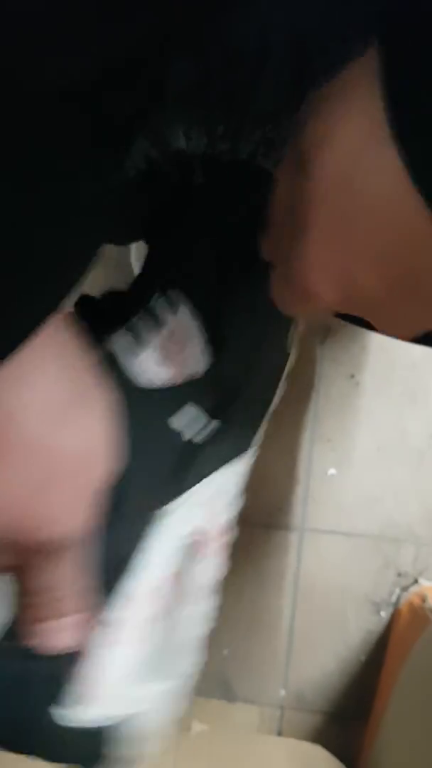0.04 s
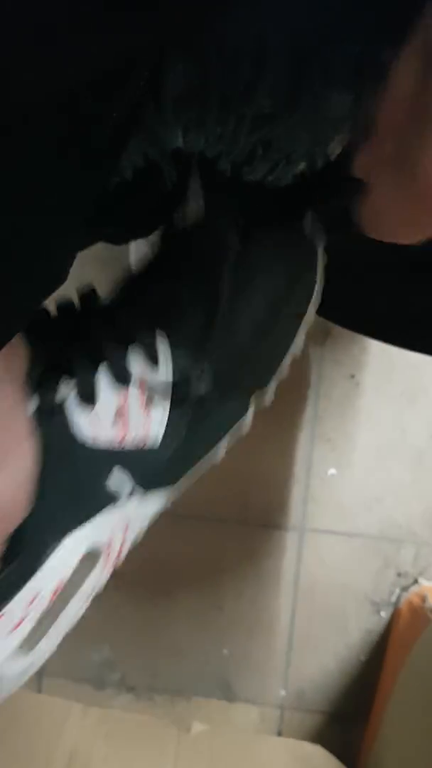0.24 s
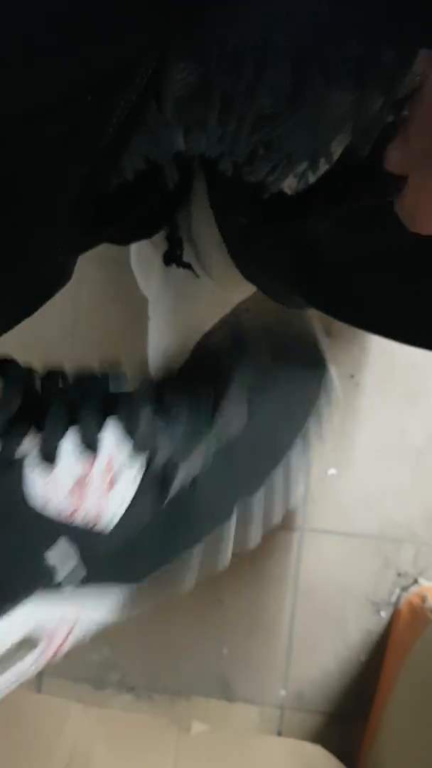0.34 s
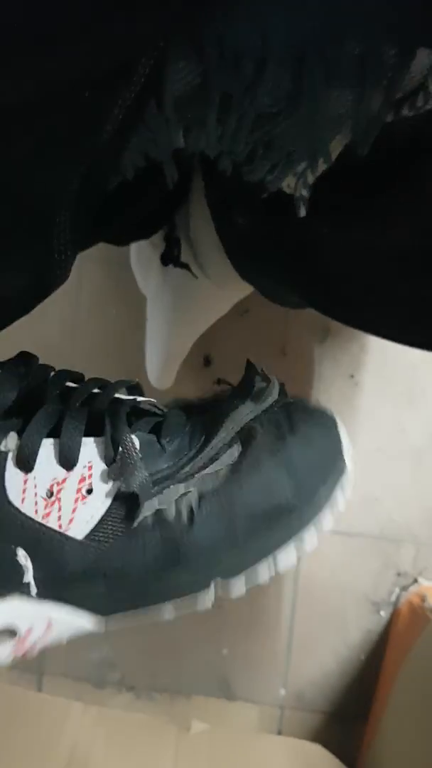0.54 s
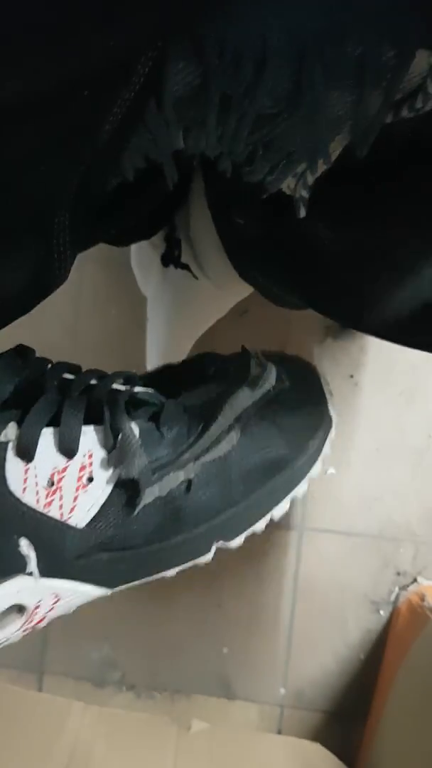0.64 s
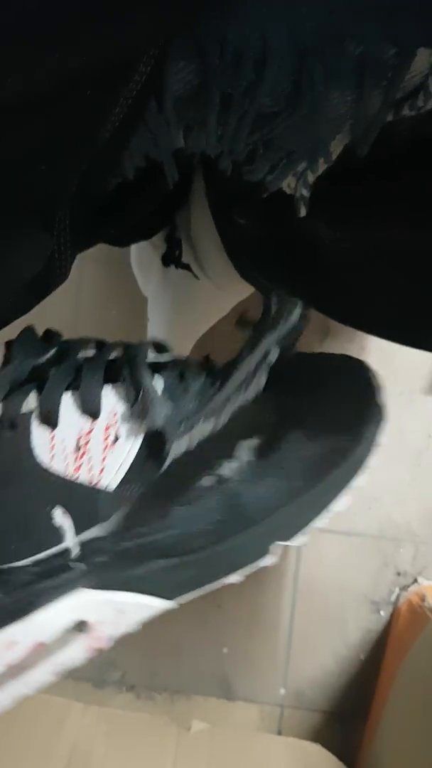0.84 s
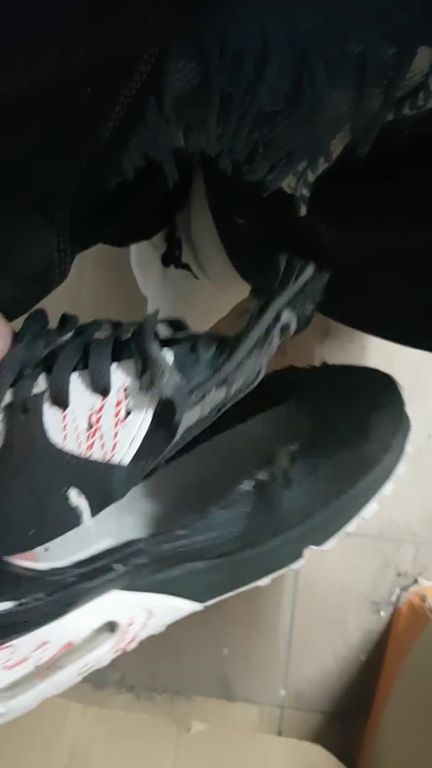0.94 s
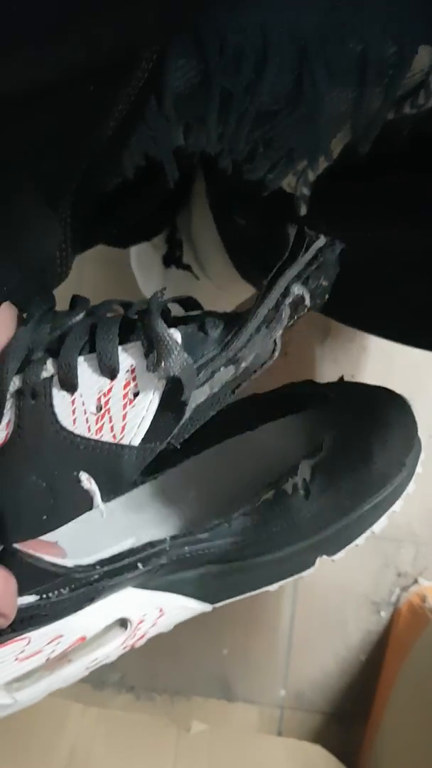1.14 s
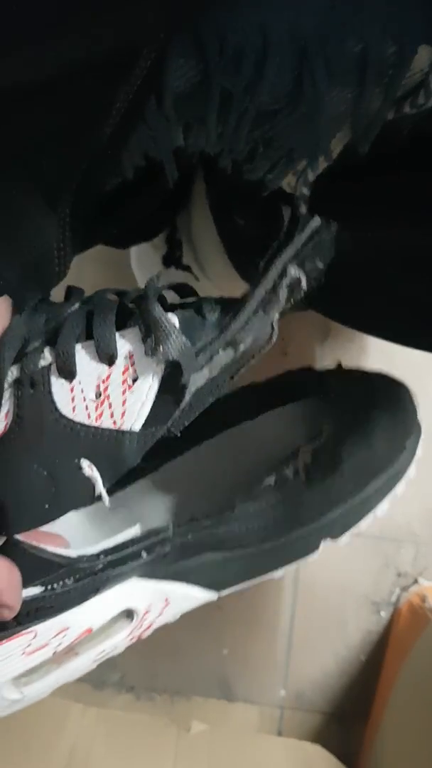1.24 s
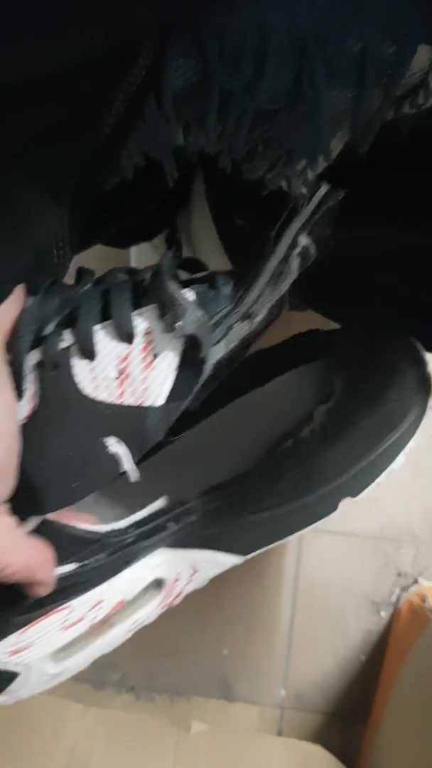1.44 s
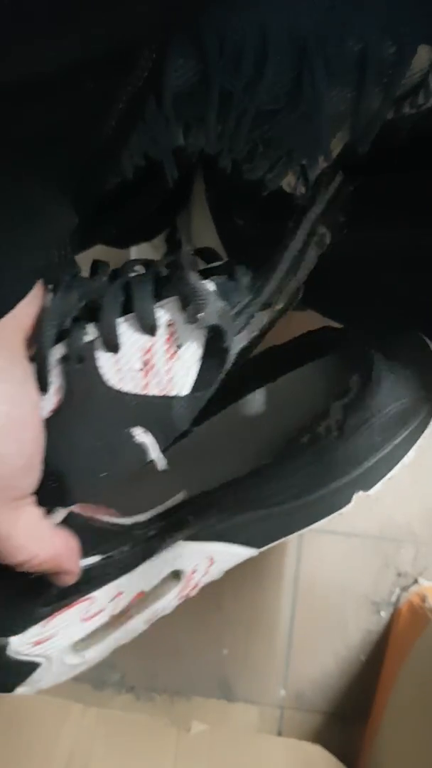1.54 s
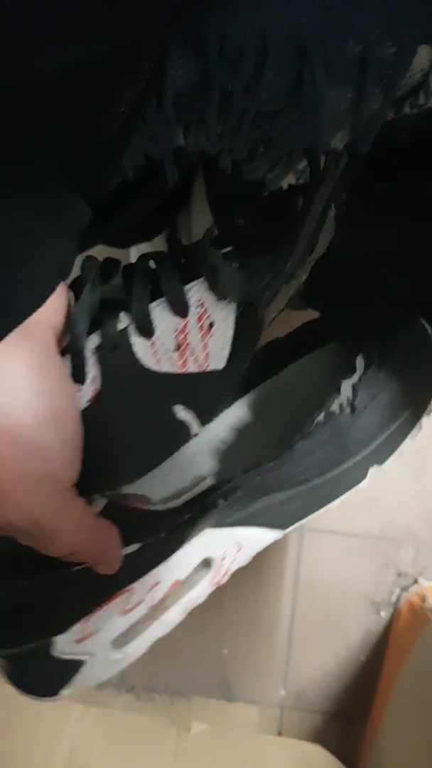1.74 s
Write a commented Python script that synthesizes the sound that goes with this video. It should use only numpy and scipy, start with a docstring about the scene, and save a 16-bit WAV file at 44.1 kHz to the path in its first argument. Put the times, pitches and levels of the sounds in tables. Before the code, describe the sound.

Quick rough rip of sneaker stitching, close on the left, followed by near silence and soft handling

```python
"""Sneaker torn from its sole

The upper of a sneaker is ripped from its sole by hand, close to the left microphone in a small quiet room.
Fibres crackle (random clicks), a run of stitches snaps (noise bursts) and each one thumps the taut panel
(short swings); the last few go late. Loose fabric rustles (filtered noise and clicks), lone threads tick,
and synthetic weave slides with a thin high zip (gliding tones), over a low hum and room air."""
import sys
import numpy as np
from scipy import signal
from scipy.fft import rfft, irfft
from scipy.io import wavfile
from scipy.ndimage import uniform_filter1d, map_coordinates

SR = 44100
rng = np.random.default_rng(int(sys.argv[2]) if len(sys.argv) > 2 else 0)


def master_out(mix):
    """Clip the mix to full scale and print it as 16-bit PCM to the path in sys.argv[1]."""
    frames = np.transpose(np.atleast_2d(mix))
    ceiling = np.clip(frames, -1, 1)
    pcm = np.round(ceiling * 32767).astype(np.int16)
    wavfile.write(sys.argv[1], SR, pcm)


N = 79380  # length in samples

# All levels in the tables are relative: later gains, filters or panning may shift them.
# strain on the fibres: [t/s, level/dB]
PULL_STRAIN = [(0, -46), (.03, -57), (.09, -60.5), (.125, -50), (.155, -50), (.195, -42), (.212, -25),
               (.238, -31), (.262, -34.5), (.29, -45.5), (.332, -49.5), (.35, -58.5), (.42, -65)]
# tone colour of the crackling fibres: [f/Hz, level/dB]
FIBRE_COLOUR = [(150, -8.5), (600, 6), (1100, 12.5), (1900, 5.5), (3500, 1.5), (6000, -4), (9500, -3.5),
                (13000, -1), (16000, 6)]
# tone colour of the panel creaking under the fibres: [f/Hz, level/dB]
CREAK_COLOUR = [(50, -16), (110, -0.5), (200, -2.5), (300, 2.5), (420, -4), (650, -1.5), (1100, -4),
                (1700, -13), (4000, -38.5)]
FIBRES_PER_S, FIBRE_SPREAD_DB, STRAIN_FLUTTER_DB = 14000, 2.0, 1.0
CREAK_DB = 1.5

# stitches that snap: [t/s, crack level/dB, crack centre f/Hz, thump level/dB, panel pitch f/Hz]
STITCHES = [(0.1180, -37, 13000, -37, 400), (0.1440, -41, 3800, -34, 650), (0.1690, -48, 9000, -37, 850),
            (0.1780, -42, 9000, -32, 1000), (0.1937, -45, 6000, -25, 1000), (0.2030, -34, 6000, -17, 760),
            (0.2083, -33, 6000, -23, 900), (0.2126, -27, 3800, -18, 780), (0.2141, -26, 4000, -17, 750),
            (0.2153, -21, 6500, -17, 800), (0.2247, -25, 5500, -18, 900), (0.2272, -26, 4500, -10, 600),
            (0.2289, -27, 10000, -11, 640), (0.2315, -26, 6000, -10, 620), (0.2339, -26, 5500, -13, 620),
            (0.2358, -35, 6000, -17, 560), (0.2376, -31, 12000, -14, 500), (0.2423, -22, 9500, -10, 560),
            (0.2487, -26, 9500, -15, 480), (0.2598, -28, 8000, -12, 680), (0.3324, -41, 7000, -25, 680),
            (0.3346, -41, 9000, -27, 1000), (0.3363, -35, 13000, -27, 820)]
CRACK_S, CRACK_WIDTH_OCT, CRACK_LIFT_DB = .0009, 1.2, 2.5
THUMP_S, SOFT_THUMP_S = .0008, .0016
# the softer swing of the upper, under each thump; its pitch scatters
UPPER_HZ, UPPER_DB, UPPER_SCATTER_OCT = 300, -11, .25
BODY_CUT_HZ = 110

# short fading tones heard after the thumps and creaks: [f/Hz, level/dB, time to fall 60 dB t/s]
RING_TONES = [(118, -2, .2), (190, -4, .16), (232, 1, .16), (283, 2, .14), (391, -7, .13), (461, -2, .14),
              (548, -5, .16), (605, -7, .15), (674, -1, .16), (740, -7, .15), (856, -8, .2), (968, -9, .19),
              (1088, -11, .18)]
RING_DB = -64.5
# tone colour of the rip and ticks at the right microphone: [f/Hz, level/dB]
FAR_COLOUR = [(60, -17.5), (250, -2), (450, -8), (700, -10.5), (1100, -9.5), (1600, -18.5), (2500, -12),
              (6000, -20.5), (11000, -39), (16000, -27)]
FAR_LAG_S = 0.00035

# echo of the room: [f/Hz, level/dB, time to fall 60 dB t/s]
ROOM_TAIL = [(120, -12, 0.15), (300, -19.5, 0.28), (670, -12, 0.2), (1160, -8.5, 0.17), (2580, -8, 0.093),
             (4970, -23, 0.16), (9900, -20, 0.44), (16000, -27, 0.14)]
ROOM_BUILD_S = 0.0026

# handling of the loose upper: [t/s, dull rubbing level/dB, hiss level/dB]
HANDLING = [(0, -50.5, -57.5), (.09, -59.5, -72), (.4, -62, -62.5), (.5, -57.5, -62.5), (.73, -59, -67.5),
            (.85, -56.5, -66.5), (.97, -61, -63.5), (1.12, -64.5, -76), (1.25, -63, -73.5),
            (1.38, -56, -69), (1.52, -57.5, -68), (1.66, -54, -64.5), (1.8, -60, -74)]
# tone colour of the rubbing: [f/Hz, level/dB]
RUB_COLOUR = [(100, -8.5), (220, 1), (420, 2.5), (850, -5.5), (1300, -17.5), (2500, -18.5), (6000, -44)]
# tone colour of the hiss: [f/Hz, level/dB]
HISS_COLOUR = [(500, -12), (1500, 2), (3300, 3), (5500, -6.5), (9000, -10.5), (16000, -2)]
RUB_PAN_DB, HISS_PAN_DB = -4, 4.5  # left minus right

# low hum: [f/Hz, level/dB, left minus right level/dB]
HUM = [(35.6, -58.5, 1), (89.1, -68, -21), (142, -62, -7)]
HUM_WAVER = 0.014  # typical pitch change, as a share of the pitch
# tone colour of the room air: [f/Hz, level/dB]
AIR_COLOUR = [(20, -6.5), (42, 23), (65, -45), (110, -1), (165, 14.5), (300, -9), (800, -8), (2000, -24),
              (6000, -44.5), (16000, -38)]
AIR_DB, AIR_PAN_DB = -62, -5

# lone ticks of thread and lace: [t/s, level/dB]
TICKS = [(0.4590, -54), (1.5948, -34)]
# tone colour of the ticks: [f/Hz, level/dB]
TICK_COLOUR = [(200, -2), (800, 7), (1800, 2), (3500, -1), (5500, 2), (10500, 0), (13000, -12),
               (16000, -20)]
TICK_S = .0005

# weave sliding over weave: [t/s, ridges crossed per second f/Hz, level/dB]
SLIDE = [(1.26, 7800, -76), (1.31, 9650, -76), (1.36, 11150, -66), (1.41, 12000, -65), (1.46, 12250, -64),
         (1.51, 11750, -65), (1.555, 12350, -65), (1.6, 14000, -67), (1.645, 14800, -70),
         (1.67, 14250, -68), (1.69, 13500, -70), (1.72, 13150, -71), (1.745, 12350, -65),
         (1.77, 11000, -72), (1.8, 8500, -82)]
# a second patch that slows and stops earlier: [t/s, ridges crossed per second f/Hz, level/dB]
SECOND_SLIDE = [(1.68, 12800, -66), (1.70, 12400, -64), (1.715, 11900, -66), (1.733, 10800, -75),
                (1.75, 9800, -100)]
# threads of the weave: [pitch ratio, level/dB]
THREADS = [(1, 0), (1.03, -6), (.965, -13), (.82, -20), (1.27, -19)]
# pitch jitter of the clear and the blurred tone (share of the pitch), and its speed
SLIDE_JITTER, SLIDE_BLUR, SLIDE_WOBBLE_HZ = .004, .08, 900
SLIDE_BLUR_DB, SLIDE_LIFT_DB, SLIDE_PAN_DB = -7, 1, 6

# softening by the microphones: [f/Hz, level/dB]
MIC_COLOUR = [(20, 0), (9000, 0), (13000, -2), (16000, -6)]
TOP_HZ = 15750


def undb(db):
    """Turn decibels into gain."""
    return 10 ** (np.asarray(db) / 20)


def unit(x):
    """Scale to an rms of 1."""
    return x / np.sqrt(np.mean(x ** 2) + 1e-20)


def curve(rows, axis=1):
    """Join one column of a table by straight lines in time."""
    rows = np.array(rows)
    return np.interp(np.arange(N) / SR, rows[:, 0], rows[:, axis])


def colour(x, points):
    """Filter through [f/Hz, level/dB] points, without any sound before its cause."""
    points, size = np.array(points), 4096
    f = np.maximum(np.arange(size // 2 + 1) * SR / size, 1)
    level_db = np.interp(np.log(f), np.log(points[:, 0]), points[:, 1])
    # folding the cepstrum (spectrum of the log spectrum) gives a minimum-phase filter
    cepstrum = irfft(np.log(undb(level_db)))
    cepstrum[1:size // 2] *= 2
    cepstrum[size // 2 + 1:] = 0
    response = irfft(np.exp(rfft(cepstrum)))
    return signal.fftconvolve(x, response)[:N]


def noise(points):
    """Make coloured noise with an rms of 1."""
    return unit(colour(rng.standard_normal(N), points))


def walk(rate_hz):
    """Make a smooth random wander with an rms of 1."""
    f = np.arange(N // 2 + 1) * SR / N
    smoothing = (1 + (f / rate_hz) ** 2) ** 2
    return unit(irfft(rfft(rng.standard_normal(N)) / smoothing, N))


def pan(db):
    """Give left and right gains that differ by db."""
    return undb(np.array([[db], [-db]]) / 2)


def grains(per_s, spread_db):
    """Scatter random clicks, most of them small, with an overall rms of 1."""
    hits = rng.random(N) < per_s / SR
    signs = np.sign(rng.standard_normal(N))
    sizes = undb(spread_db * np.minimum(rng.exponential(size=N), 5))
    return unit(hits * signs * sizes)


def burst(start, decay_s):
    """A thread parts in a short fading spray of noise, of rms 1 over its decay time."""
    age = np.arange(N) / SR - start
    spray = (age >= 0) * np.exp(-np.abs(age) / decay_s) * np.tanh(rng.standard_normal(N))
    return spray * np.sqrt(decay_s * SR) / np.linalg.norm(spray)


def fibres():
    """Fibres part in random clicks as strain changes, giving bright crackle and dull panel creak."""
    clicks = grains(FIBRES_PER_S, FIBRE_SPREAD_DB)
    strain = undb(curve(PULL_STRAIN) + STRAIN_FLUTTER_DB * walk(rate_hz=240))
    crackle = strain * unit(colour(clicks, FIBRE_COLOUR))
    creak = undb(CREAK_DB) * strain * unit(colour(clicks, CREAK_COLOUR))
    return crackle, creak


def crack(start, centre_hz):
    """One thread parts in a noise burst around its centre; thin threads crack higher."""
    hz = np.geomspace(200, 16000, num=12)
    octaves_off = np.log2(hz / centre_hz)
    db = -10 * np.log10(1 + (octaves_off / CRACK_WIDTH_OCT) ** 2)
    return colour(burst(start, CRACK_S), np.column_stack([hz, db]))


def recoil(start, hz, decay_s):
    """A released panel swings briefly: a sine that swells and dies away."""
    age = np.maximum(np.arange(N) / SR - start, 0)
    swell = age / decay_s * np.exp(1 - age / decay_s)
    return -swell * np.sin(2 * np.pi * hz * age)


def stitches():
    """Each snapping stitch gives a crack, and a thump of two panel swings."""
    cracks, thumps = 0, 0
    for start, crack_db, crack_hz, thump_db, panel_hz in STITCHES:
        cracks = cracks + undb(crack_db + CRACK_LIFT_DB) * crack(start, crack_hz)
        upper_hz = UPPER_HZ * 2 ** (UPPER_SCATTER_OCT * rng.standard_normal())
        soft = undb(UPPER_DB) * recoil(start, upper_hz, SOFT_THUMP_S)
        thumps = thumps + undb(thump_db) * (recoil(start, panel_hz, THUMP_S) + soft)
    return cracks, thumps


def low_ring(body):
    """The thumps and creaks set off short fading tones."""
    t = np.arange(N) / SR
    ring = sum(undb(db - 60 * t / t60) * np.cos(2 * np.pi * hz * t) for hz, db, t60 in RING_TONES)
    return undb(RING_DB) * signal.fftconvolve(body, ring)[:N]


def rip():
    """Tearing fibres and snapping stitches shake the panel, and a short low ring follows."""
    crackle, creak = fibres()
    cracks, thumps = stitches()
    low_cut = signal.butter(2, BODY_CUT_HZ, "high", fs=SR, output="sos")
    body = signal.sosfilt(low_cut, thumps + creak)
    return body + low_ring(body) + cracks + crackle


def room(x):
    """Many blended echoes make a short tail, different at each microphone and in each pitch band."""
    t = np.arange(N) / SR
    band_hz = np.array(ROOM_TAIL)[:, 0]
    log_f = np.log(np.maximum(np.arange(N // 2 + 1) * SR / N, 1))
    white = rfft(rng.standard_normal((2, N)))
    tail = 0
    # each row of the identity matrix picks one band, which overlaps its neighbours
    for (_, db, t60), share in zip(ROOM_TAIL, np.eye(len(ROOM_TAIL))):
        fade = np.exp(-np.log(1000) * t / t60) * (1 - np.exp(-(t / ROOM_BUILD_S) ** 2))
        band = irfft(white * np.interp(log_f, np.log(band_hz), share), N)
        tail = tail + undb(db) * fade / np.linalg.norm(fade) * band
    return signal.fftconvolve(x[None], tail, axes=1)[:, :N]


def handling():
    """Loose fabric rubs as soft dull noise and hisses as a dense spray of clicks."""
    rub = np.array([noise(RUB_COLOUR) for _ in range(2)])
    rub_level = undb(curve(HANDLING, axis=1) + 0.76 * walk(rate_hz=63))
    hiss = np.array([unit(colour(grains(per_s=14000, spread_db=3.2), HISS_COLOUR)) for _ in range(2)])
    hiss_level = undb(curve(HANDLING, axis=2))
    return rub * rub_level * pan(RUB_PAN_DB) + hiss * hiss_level * pan(HISS_PAN_DB)


def hum():
    """Low sine tones waver slightly in pitch."""
    total = 0
    for hz, db, side_db in HUM:
        pitch = hz * (1 + HUM_WAVER * walk(rate_hz=12))
        tone = np.sqrt(2) * np.sin(2 * np.pi * np.cumsum(pitch) / SR)  # rms 1
        total = total + undb(db) * pan(side_db) * tone
    return total


def room_air():
    """The air of the room is steady noise, partly shared by both sides."""
    shared = noise(AIR_COLOUR)
    separate = np.array([noise(AIR_COLOUR), noise(AIR_COLOUR)])
    return undb(AIR_DB) * unit(shared + 0.75 * separate) * pan(AIR_PAN_DB)


def ticks():
    """Lone noise bursts tick as the shoe is turned."""
    bursts = sum(undb(db) * burst(start, TICK_S) for start, db in TICKS)
    return colour(bursts, TICK_COLOUR)


def slide(path):
    """Ridges of the weave cross each other: a thin zip whose pitch follows the hand's speed."""
    hz = uniform_filter1d(curve(path, axis=1), size=900)

    def tone(ratio, jitter):
        """A sine follows the ridge rate with random pitch jitter."""
        pitch = hz * ratio * (1 + jitter * walk(rate_hz=SLIDE_WOBBLE_HZ))
        return np.sin(2 * np.pi * np.cumsum(pitch) / SR)

    def one_side():
        """All threads sound together, each as a clear and a blurred tone."""
        return sum(undb(db) * (tone(ratio, SLIDE_JITTER) + undb(SLIDE_BLUR_DB) * tone(ratio, SLIDE_BLUR))
                   for ratio, db in THREADS)

    sides = np.array([one_side() for _ in range(2)])
    started = 1. * (np.arange(N) / SR > path[0][0])
    moving = uniform_filter1d(started, size=600)  # soft start
    return sides * moving * undb(curve(path, axis=2) + SLIDE_LIFT_DB) * pan(SLIDE_PAN_DB)


def scene():
    """The shoe is near the left microphone; the right one hears it later and duller."""
    near = rip() + ticks()
    far = map_coordinates(colour(near, FAR_COLOUR), [np.arange(N) - FAR_LAG_S * SR], order=3)
    shoe = np.array([near, far]) + room(near)
    zips = slide(SLIDE) + slide(SECOND_SLIDE)
    return shoe + handling() + zips + hum() + room_air()


def record(dry):
    """The microphones soften the top and the recorder cuts it off steeply."""
    soft = np.array([colour(side, MIC_COLOUR) for side in dry])
    top_cut = signal.ellip(10, .2, 70, TOP_HZ, fs=SR, output="sos")  # 0.2 dB ripple, 70 dB cut
    return signal.sosfilt(top_cut, soft)


dry = scene()
out = record(dry)
master_out(out)
```